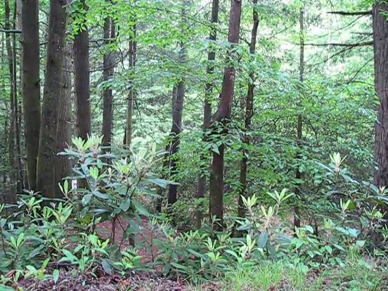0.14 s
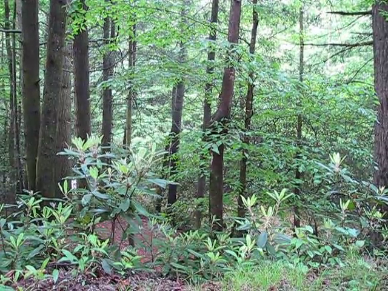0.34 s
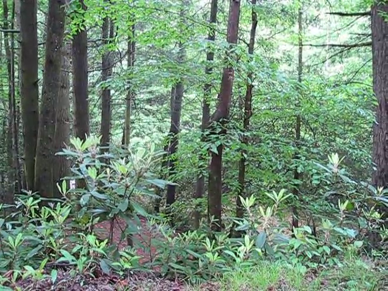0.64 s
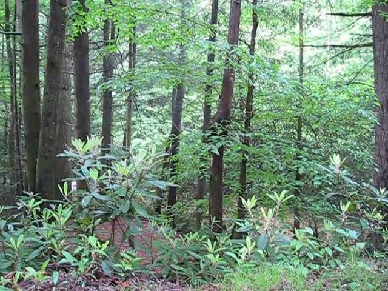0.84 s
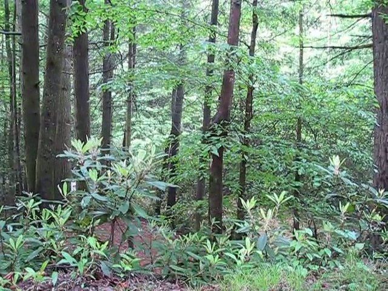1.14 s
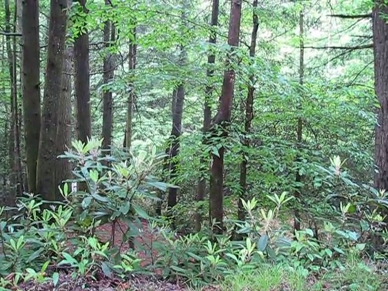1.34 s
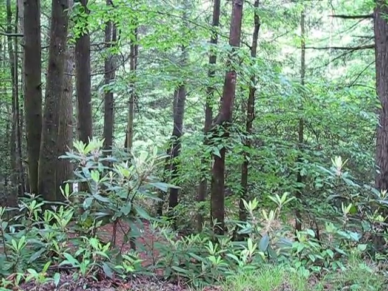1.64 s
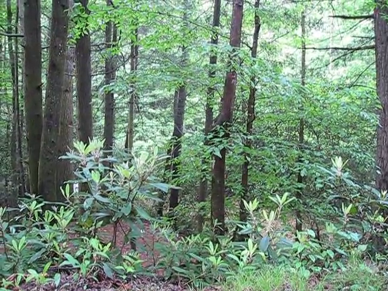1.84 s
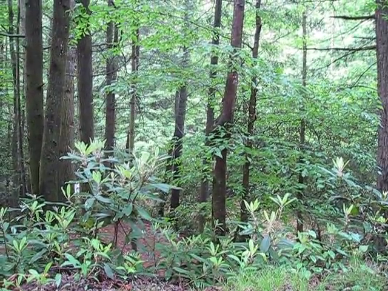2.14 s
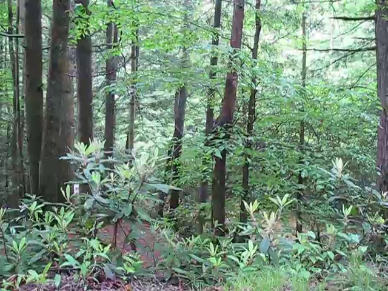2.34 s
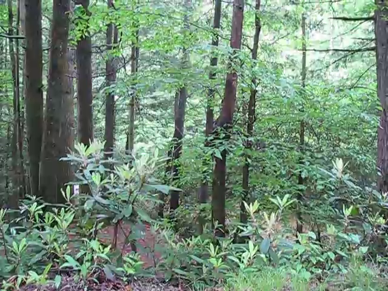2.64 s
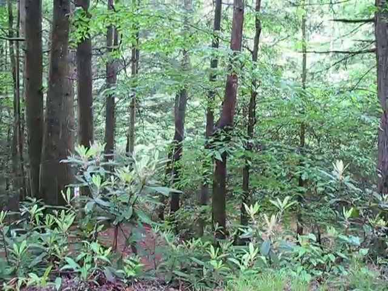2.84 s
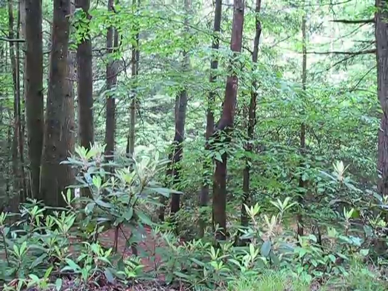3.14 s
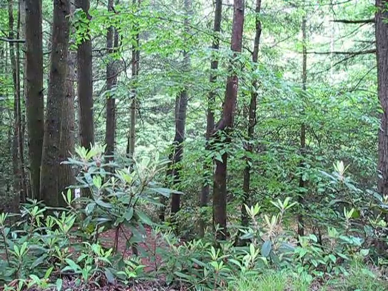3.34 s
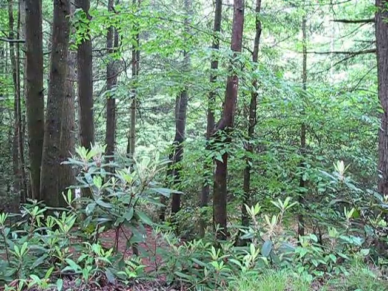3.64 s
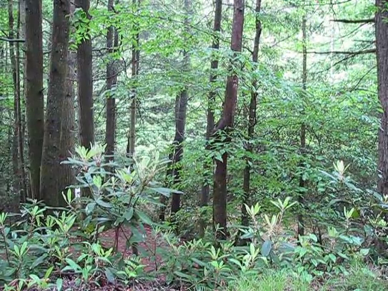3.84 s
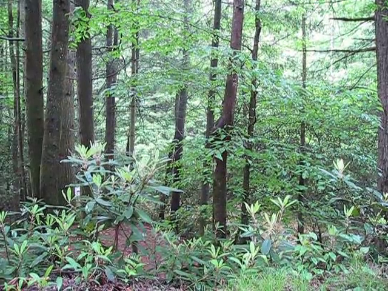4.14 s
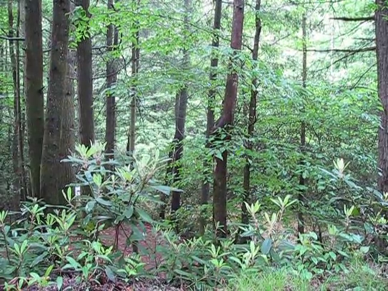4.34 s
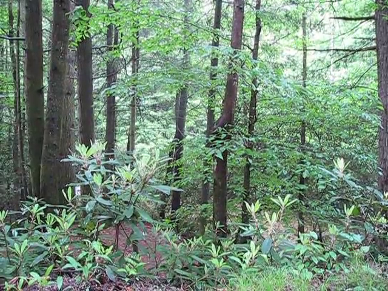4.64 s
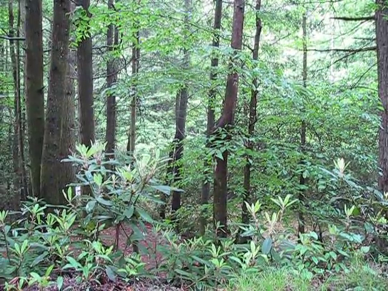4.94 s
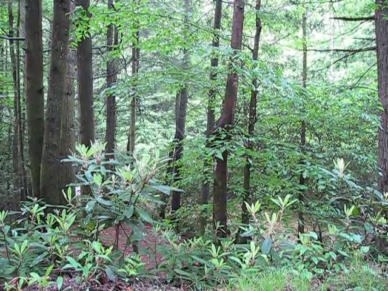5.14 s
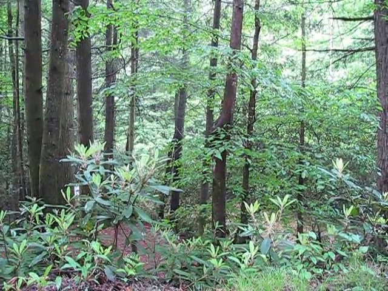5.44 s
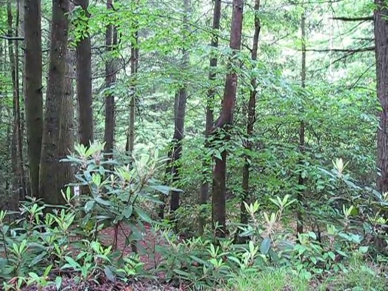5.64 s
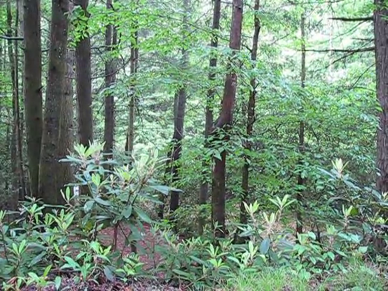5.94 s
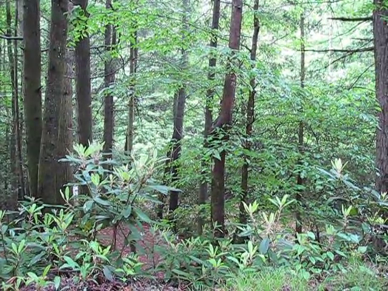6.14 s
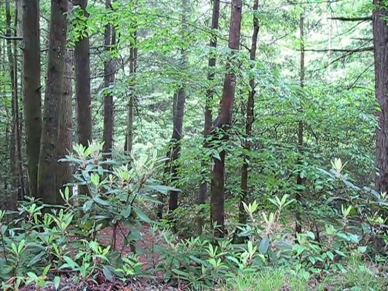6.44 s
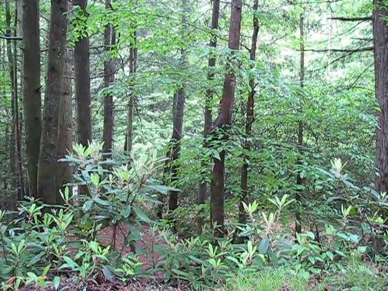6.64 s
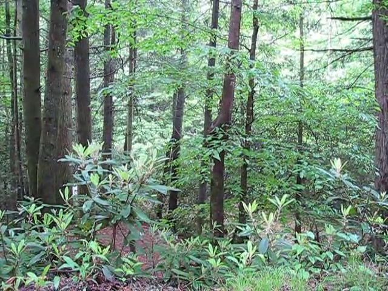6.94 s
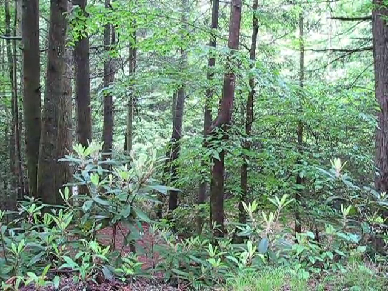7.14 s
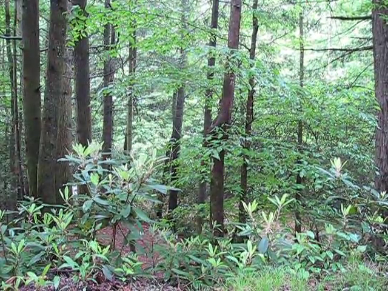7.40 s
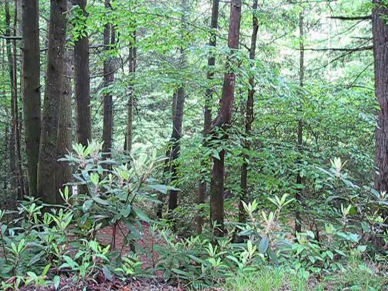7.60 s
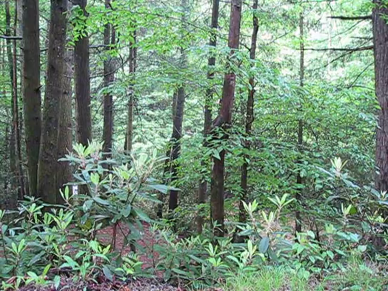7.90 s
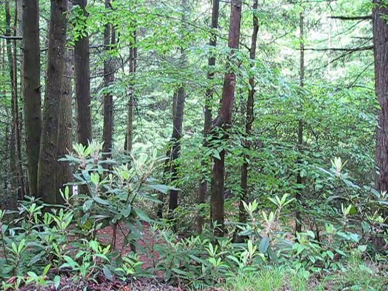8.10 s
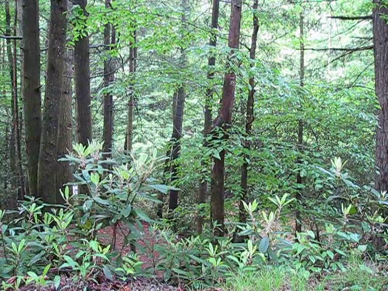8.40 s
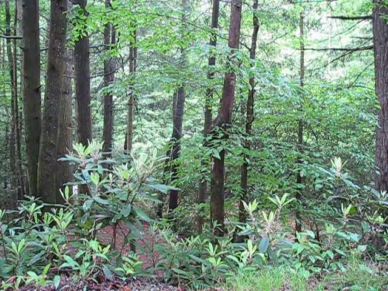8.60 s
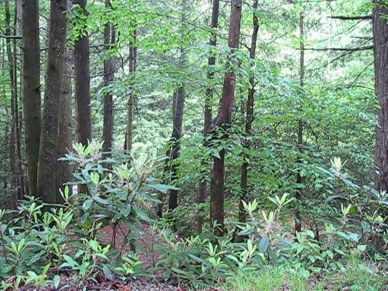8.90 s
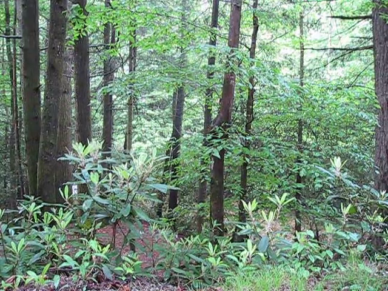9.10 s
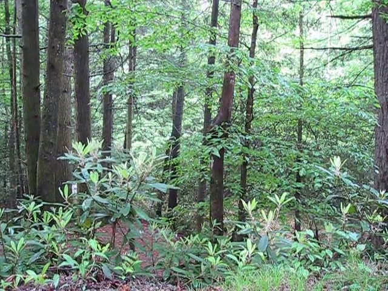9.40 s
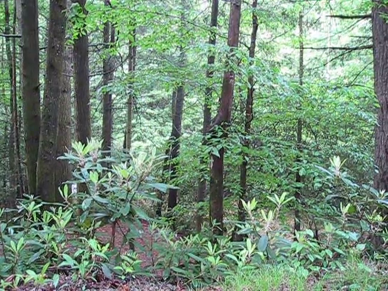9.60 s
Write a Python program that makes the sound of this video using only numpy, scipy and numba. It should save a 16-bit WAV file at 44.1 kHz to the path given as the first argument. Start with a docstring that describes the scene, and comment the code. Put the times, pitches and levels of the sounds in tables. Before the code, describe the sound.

From 0 to about 10 s a river rushes steadily, a full low-mid roar under bright spray hiss, with only tiny flickers. At 0 s a clear bird whistle, near 3.9 kHz, is answered half a second later by a softer, lower note; this two-note call returns at 3.6 and 7.3 s. Short chirps and faint far twitter are scattered between. Thin, high falling treetop whistles come at 0.3 s, from 3 to 4 s and from 7 to 8 s. Distant quick warbles flutter at 1.3, 2.3, 3.2, 4.3, 5.4, 8.6 and 9.6 s. From 6.9 s a close warbler begins softly, then sings strong downward slurs at 7.1, 7.4 and 7.7 s, accelerating into a sharp jumble ending by 8.8 s. Woodland echoes smear every bird note; the river ducks slightly under the loudest, then continues.

```python
"""Forest birds by a rushing river

River noise in flickering bands runs throughout. Near-pure gliding tones give far two-note calls,
lone chirps, faint twitter, thin high whistles and warbled phrases; near the end a close warbler
sings slurred notes and a quick jumble. Trunks and leaves scatter every note, and the recorder's
gain control ducks the river under the loudest ones."""
import sys
import numpy as np
from scipy import signal
from scipy.fft import rfft, irfft
from scipy.io import wavfile
from numba import njit

SR = 44100
rng = np.random.default_rng(int(sys.argv[2]) if len(sys.argv) > 2 else 0)


def transcribe(signal):
    """Save signal, clipped to [-1, 1], as a 16-bit WAV file at the path in sys.argv[1]."""
    frames = np.atleast_2d(signal).T
    limited = np.clip(frames, -1, 1)
    pcm = np.round(limited * 32767).astype(np.int16)
    wavfile.write(sys.argv[1], SR, pcm)


N = 430416
TIME = np.arange(N) / SR
FREQ = np.fft.rfftfreq(N, 1 / SR)


def undb(db):
    """Decibels to gain."""
    return 10 ** (np.asarray(db) / 20)


def level(x, db):
    """Scale to an rms level."""
    return x * undb(db) / np.sqrt(np.mean(x ** 2))


def walk(rate):
    """Smooth chance with spread 1 that changes about rate times a second."""
    white = rfft(rng.standard_normal(N))
    return level(irfft(white * np.exp(-(FREQ / rate) ** 2), N), 0)


def add(out, start, sound):
    """Mix a sound in at its time."""
    i = int(np.clip(start * SR, 0, N))
    out[i:i + len(sound)] += sound[:N - i]


def water(spectrum, flicker_db, count):
    """Countless splashes merge to noise; all bands surge with the flow and each flickers on its own."""
    hz, db = np.transpose(spectrum)
    shape_db = np.interp(np.log(FREQ + 1), np.log(hz), db)
    noise = rfft(rng.standard_normal(N)) * undb(shape_db)
    edges = np.geomspace(hz[0], hz[-1], count + 1)
    surge_db = 0.11 * walk(1.5)
    out = np.zeros(N)
    for lo, hi in zip(edges, edges[1:]):
        band = irfft(noise * ((FREQ >= lo) & (FREQ < hi)), N)
        out += band * undb(surge_db + flicker_db * walk(16))
    return out


# spectrum of the river's low roar: (f/Hz, relative level/dB)
ROAR_SPECTRUM = [(15, -60), (25, -26.5), (108, -23), (233, -13), (289, -9), (421, -8), (663, -2.5),
                 (874, -5.5), (945, -3.5), (1300, -5.5), (1710, -2), (2340, -1.5), (2800, -1.5),
                 (3640, -31), (6160, -120)]
# spectrum of the hissing spray: (f/Hz, relative level/dB)
SPRAY_SPECTRUM = [(2700, -7), (2950, -1), (3250, -.5), (3600, 3.5), (4050, 0), (4500, -6), (5500, -10.5),
                  (7000, -17), (8500, -26.5), (9400, -31.5), (11000, -32.5), (13500, -39.5), (15000, -46.5),
                  (18000, -48)]
ROAR_RMS_DB, SPRAY_RMS_DB = -31, -28.5


def river():
    """The low roar of falling water and the hiss of its spray."""
    roar = water(ROAR_SPECTRUM, flicker_db=0.23, count=10)
    spray = water(SPRAY_SPECTRUM, flicker_db=0.35, count=12)
    return level(roar, ROAR_RMS_DB) + level(spray, SPRAY_RMS_DB)


def syrinx(hz, db, waver, edge_s):
    """One near-pure note whose pitch trembles a little; it opens and closes softly."""
    n = len(hz)
    # the tremble takes 200 random pitch offsets a second, joined by straight lines
    tremble = np.interp(np.arange(n) / SR, np.arange(200) / 200, rng.standard_normal(200))
    gate = signal.windows.tukey(n, min(1, 2 * edge_s * SR / n))
    phase = 2 * np.pi * np.cumsum(hz * (1 + waver * tremble)) / SR
    return np.sqrt(2) * undb(db) * gate * np.sin(phase)


def glide(first_hz, last_hz, left, settle):
    """Pitch slide as left runs from 1 to 0; settle 1 slides evenly, more arrives sooner."""
    return last_hz + (first_hz - last_hz) * left ** settle


def slurs(notes, waver, edge_s, settle):
    """Simple notes that each glide to their last pitch."""
    out = np.zeros(N)
    for start, length, first_hz, last_hz, db in notes:
        left = np.linspace(1, 0, int(length * SR))
        hz = glide(first_hz, last_hz, left, settle)
        add(out, start, syrinx(hz, db, waver, edge_s))
    return out


# two-note calls: (start t/s, delay until the low note t/s, high note level/dB before distance and echo)
TWO_NOTE_CALLS = [(0, .55, -26), (3.555, .635, -23.5), (7.32, .54, -25)]
HIGH_HZ, HIGH_S = 3880, .22
LOW_HZ, LOW_S, LOW_DB = 3367, 0.204, -5.5  # the level is relative to the high note
CALL_SAG_HZ = 44.8  # both notes start this much above their pitch
CATCH_AT_S, CATCH_S = .075, .03  # both notes break off briefly and then go on


def two_note_calls():
    """A clear high note, a pause, and a softer low one; each sags, catches and holds."""
    notes = []
    resume = CATCH_AT_S + CATCH_S
    for start, gap, db in TWO_NOTE_CALLS:
        high = (start, HIGH_S, HIGH_HZ, db)
        low = (start + gap, LOW_S, LOW_HZ, db + LOW_DB)
        for at, length, hz, note_db in [high, low]:
            notes.append((at, CATCH_AT_S, hz + CALL_SAG_HZ, hz, note_db))
            notes.append((at + resume, length - resume, hz, hz, note_db))
    return slurs(notes, waver=0.0011, edge_s=0.0059, settle=1.0)


# lone notes from deep in the wood:
# (start t/s, length t/s, first f/Hz, last f/Hz, level/dB before distance and echo)
LONE_CHIRPS = [(0, 0.071, 3560, 3560, -27), (.325, .04, 4020, 3610, -26), (1.355, 0.048, 3740, 3640, -27.5),
               (3.3, .23, 3940, 3880, -31), (3.97, 0.068, 3550, 3566, -27.5), (5.47, .05, 4830, 4770, -40),
               (7.64, 0.1, 3800, 4040, -33), (7.815, 0.049, 5750, 5760, -31),
               (7.84, 0.13, 3960, 3910, -29.5)]


def lone_chirps():
    """Single short notes that glide gently to their last pitch."""
    return slurs(LONE_CHIRPS, waver=0.0072, edge_s=.01, settle=1.5)


def twitter(centre_hz, db, count):
    """Faint chirps of the farthest birds, with random times, pitches and glides."""
    when, length, pitch, bend, size = rng.random((count, 5)).T
    first_hz = centre_hz * 2 ** (.3 * (pitch - .5))
    last_hz = first_hz * 2 ** (.25 * (bend - .5))
    notes = zip(when * N / SR, 0.0415 + 0.063 * length, first_hz, last_hz, db - 8 * size)
    return slurs(notes, waver=0.0096, edge_s=.015, settle=1.7)


# thin treetop whistles: (start t/s, length t/s, last f/Hz, level/dB before distance and echo)
TREETOP_WHISTLES = [(.3, 0.22, 6120, -34.5), (3.0, 0.21, 6480, -43.5), (3.25, .08, 6750, -42),
                    (3.329, 0.21, 6260, -39.5), (3.64, 0.21, 6560, -42.5), (3.9, .23, 6110, -34),
                    (6.97, .11, 6800, -45), (7.092, .19, 6350, -39), (7.356, 0.11, 6580, -41),
                    (7.648, 0.21, 6160, -35), (8.082, 0.12, 6460, -39.5)]
WHISTLE_FALL_HZ_PER_S = 1300  # averaged over each whistle


def thin_whistles():
    """A bird in the treetops: the longer its whistle, the farther it falls."""
    notes = []
    for start, length, last_hz, db in TREETOP_WHISTLES:
        first_hz = last_hz + WHISTLE_FALL_HZ_PER_S * length
        notes.append((start, length, first_hz, last_hz, db))
    return slurs(notes, waver=0.0049, edge_s=0.027, settle=2.3)


# quick warbled phrases of a far songbird; the slope excludes the swings:
# (start t/s, length t/s, slope's first f/Hz, slope's last f/Hz, level/dB before distance and echo)
WARBLED_PHRASES = [(1.26, .16, 2770, 3270, -30), (2.301, 0.3, 4400, 3420, -29),
                   (3.204, 0.35, 3530, 3930, -36), (4.304, 0.2, 3590, 4050, -35),
                   (5.401, .25, 4300, 3670, -30.5), (8.6, 0.066, 2900, 2615, -27),
                   (9.596, 0.21, 3710, 3920, -27)]


def warbles(swing, turns_hz):
    """Each far phrase swings its pitch quickly up and down along a slope."""
    out = np.zeros(N)
    for start, length, first_hz, last_hz, db in WARBLED_PHRASES:
        t = TIME[:int(length * SR)]
        turns = np.sin(2 * np.pi * (turns_hz * t + rng.random()))
        slope_hz = np.geomspace(first_hz, last_hz, len(t))
        add(out, start, syrinx(slope_hz * (1 + swing * turns), db, waver=0.0147, edge_s=0.028))
    return out


# the close warbler's notes, before wobble and flutter; the level is that at the throat resonance, before echo:
# (start t/s, length t/s, first f/Hz, last f/Hz, level/dB, settle [1 slides evenly, more arrives sooner])
WARBLER_SONG = [(6.872, .068, 5010, 4980, -29.5, 1), (7.083, .168, 6050, 4886, -14.5, 1.24),
                (7.39, 0.17, 5980, 4736, -11.5, 1.2), (7.684, 0.089, 5075, 4555, -7, 1),
                (7.765, 0.13, 4540, 5240, -17.5, 3.1), (7.938, 0.1, 4990, 4140, -11, 1.44),
                (8.12, .04, 3320, 3516, -11.5, .7), (8.158, 0.079, 3620, 4137, -12.5, 1.4),
                (8.22, 0.072, 4100, 4890, -16.5, 2), (8.352, 0.072, 3950, 3285, -12, 2.2),
                (8.428, 0.061, 3750, 3520, -22.5, 2.4), (8.499, 0.016, 3840, 4020, -11.5, 2),
                (8.524, 0.026, 4056, 3910, -18, 0.74), (8.553, 0.0346, 3980, 3660, -18.5, 0.37),
                (8.582, .052, 7180, 4890, -16, 7.4), (8.636, 0.019, 4940, 4040, -28, 1),
                (8.735, 0.012, 5350, 3880, -22.5, 1.1), (8.745, 0.013, 4020, 5850, -20, 1)]
# throat resonance: a note grows louder as it slides towards this pitch
THROAT_HZ, THROAT_OCTAVES, THROAT_DB = 4225, 0.43, 15.5
# each note swells from SWELL_DB below its level during the first share of its length
SWELL_DB, SWELL_SHARE = 4.5, 0.24
# the voice is never quite steady: its pitch wobbles (share) and its loudness flutters (dB)
WOBBLE, FLUTTER_DB, WOBBLE_PER_S = .006, 3, 26


def warbler():
    """The close bird slides each note to its last pitch; it swells and is favoured near the throat resonance."""
    out = np.zeros(N)
    wobble = 1 + WOBBLE * walk(WOBBLE_PER_S)
    flutter_db = FLUTTER_DB * walk(WOBBLE_PER_S)
    for start, length, first_hz, last_hz, db, settle in WARBLER_SONG:
        left = np.linspace(1, 0, int(length * SR))
        now = int(start * SR) + np.arange(len(left))
        hz = glide(first_hz, last_hz, left, settle) * wobble[now]
        octaves_off = np.log2(hz / THROAT_HZ)
        throat_db = THROAT_DB * (np.exp(-(octaves_off / THROAT_OCTAVES) ** 2) - 1)
        swell_db = SWELL_DB * np.minimum((1 - left) / SWELL_SHARE - 1, 0)
        note_db = db + throat_db + swell_db + flutter_db[now]
        add(out, start, syrinx(hz, note_db, waver=0.0036, edge_s=0.0025))
    return out


def forest(x, trunks_db, leaves_db, t60_s):
    """Direct sound, early echoes off trunks, and a long diffuse tail from the foliage."""
    t = TIME[:int(1.5 * SR)]
    trunks = np.zeros(len(t))
    lags = rng.uniform(.003, .09, size=40)
    trunks[(lags * SR).astype(int)] = rng.standard_normal(len(lags)) * np.exp(-lags / 0.021)
    build_up = 1 - np.exp(-t / 0.033)
    leaves = rng.standard_normal(len(t)) * undb(-60 * t / t60_s) * build_up
    echoes = undb(trunks_db) * trunks / np.linalg.norm(trunks)
    echoes += undb(leaves_db) * leaves / np.linalg.norm(leaves)
    return x + signal.fftconvolve(x, echoes)[:N]


def scene():
    """The farther the bird, the more of its sound arrives as echo."""
    water_noise = river()
    calls = two_note_calls() + lone_chirps()
    middle = undb(-2.5) * forest(calls, trunks_db=-7.5, leaves_db=-2.0, t60_s=1.7)
    chatter = twitter(centre_hz=3655, db=-38.5, count=30) + warbles(swing=0.1106, turns_hz=16)
    far = undb(-9) * forest(chatter, trunks_db=-0.5, leaves_db=2.5, t60_s=0.82)
    treetops = undb(-4.5) * forest(thin_whistles(), trunks_db=-4.5, leaves_db=1.0, t60_s=0.88)
    near = forest(warbler(), trunks_db=-4.5, leaves_db=-3.5, t60_s=0.9)
    return (water_noise + middle + far + treetops + near)[None]


@njit
def follower(x, attack, release):
    """Peak envelope that rises fast and falls slowly."""
    out, e = np.empty(len(x)), 0.
    for i in range(len(x)):
        e += (abs(x[i]) - e) * (attack if abs(x[i]) > e else release)
        out[i] = e
    return out


# microphone colour, boosts and the port's treble notches: (centre f/Hz, width f/Hz, level/dB)
MIC_COLOUR = [(703, 140, 1.5), (7875, 174, -15), (7880, 45, -22), (8460, 480, 4.5)]
TOP_HZ = 17150


def record(dry, limit_db=-9.5, attack_s=0.00042, release_s=0.054):
    """The microphone port notches the treble; gain control holds the peaks down; the top is cut."""
    colour_db = sum(db * np.exp(-((FREQ - hz) / width) ** 2) for hz, width, db in MIC_COLOUR)
    x = irfft(rfft(dry[0]) * undb(colour_db), N)
    envelope = follower(x, 1 / (attack_s * SR), 1 / (release_s * SR))
    x = x / np.maximum(envelope / undb(limit_db), 1)
    low_pass = signal.ellip(10, .1, 80, TOP_HZ, fs=SR, output="sos")
    return signal.sosfilt(low_pass, x)[None]


dry = scene()
out = record(dry)
transcribe(out)
```